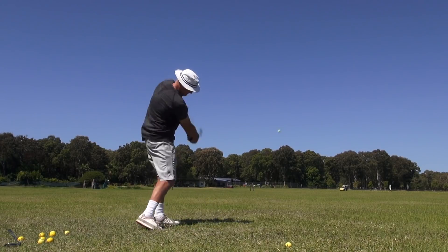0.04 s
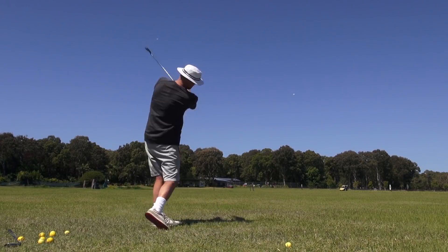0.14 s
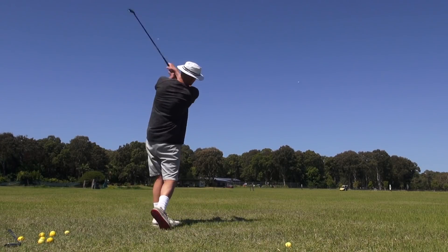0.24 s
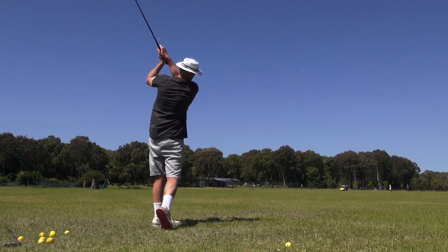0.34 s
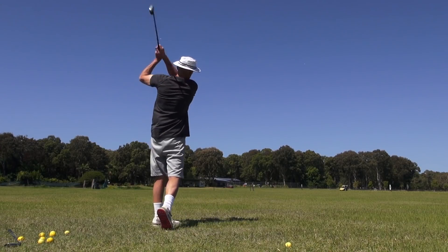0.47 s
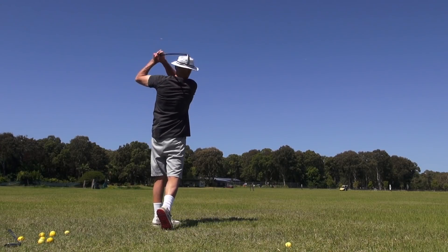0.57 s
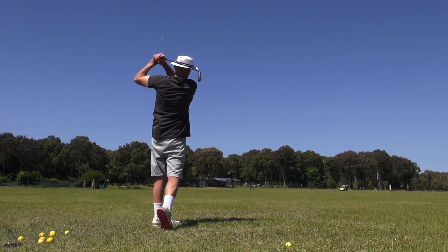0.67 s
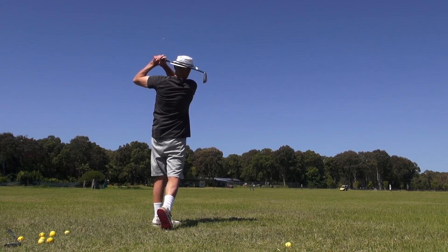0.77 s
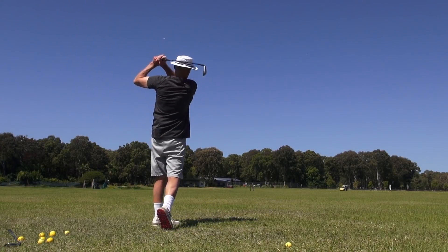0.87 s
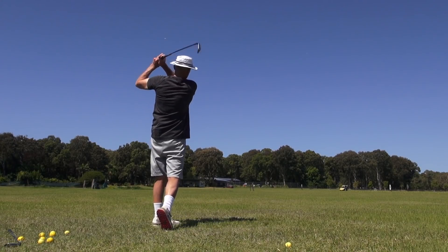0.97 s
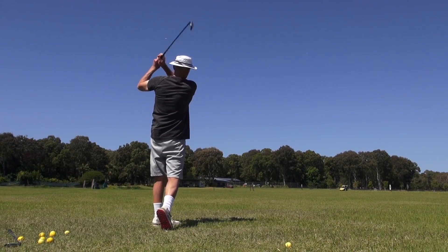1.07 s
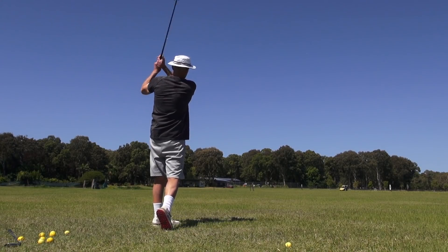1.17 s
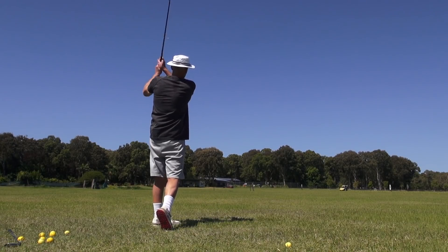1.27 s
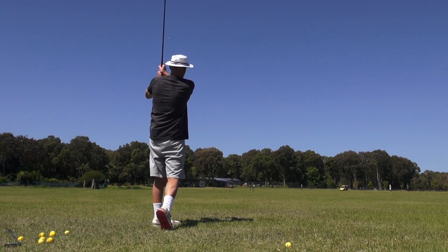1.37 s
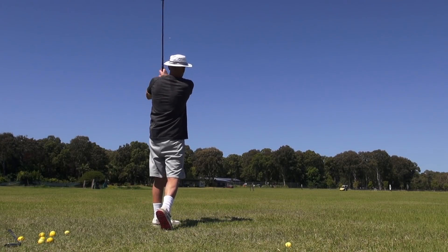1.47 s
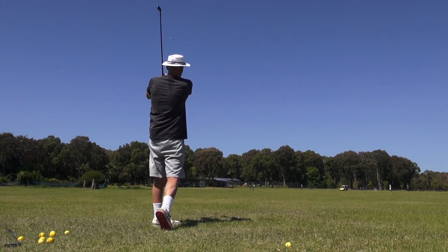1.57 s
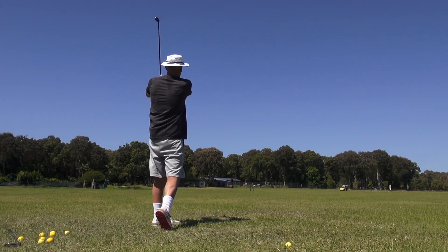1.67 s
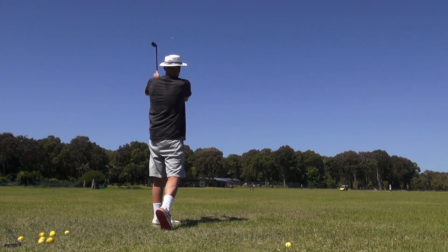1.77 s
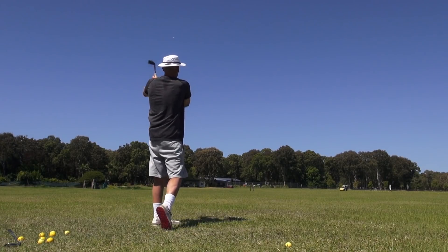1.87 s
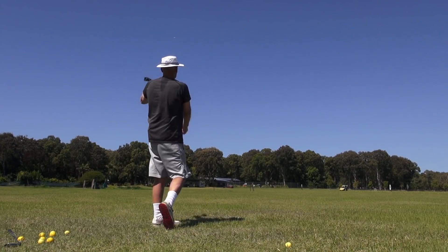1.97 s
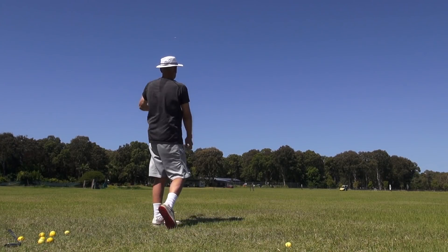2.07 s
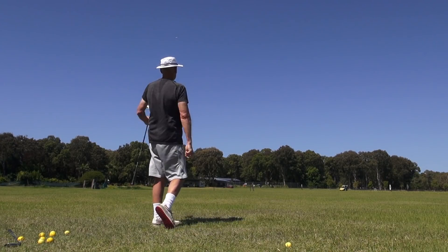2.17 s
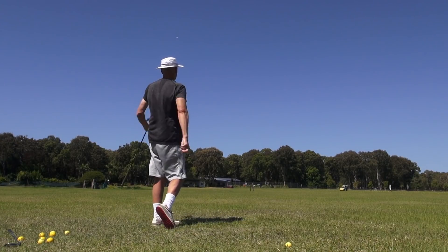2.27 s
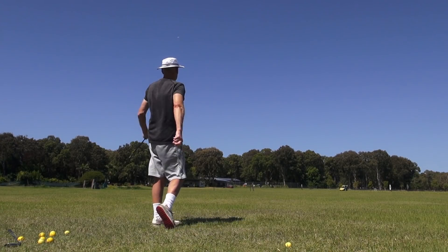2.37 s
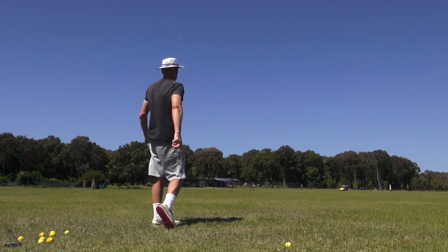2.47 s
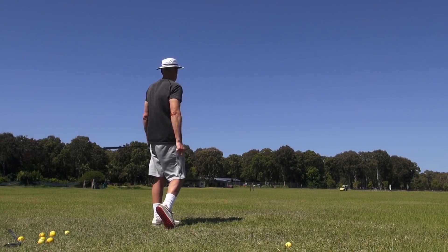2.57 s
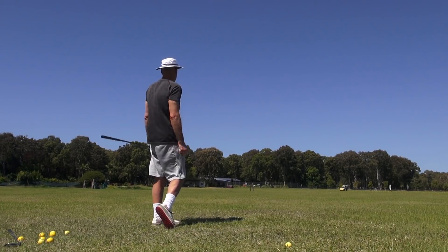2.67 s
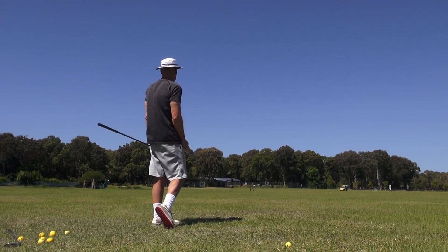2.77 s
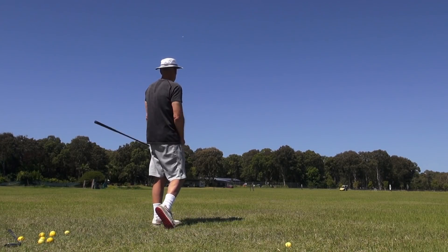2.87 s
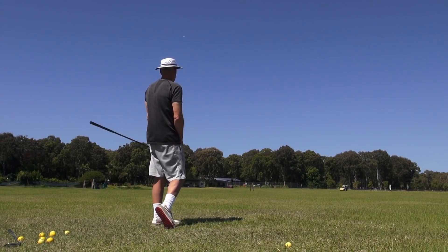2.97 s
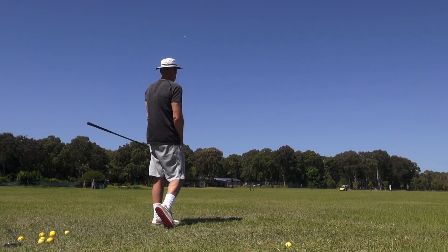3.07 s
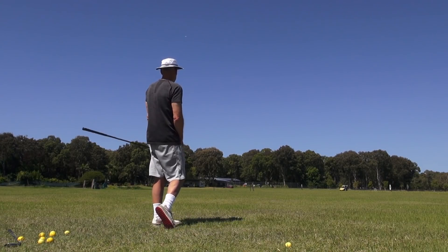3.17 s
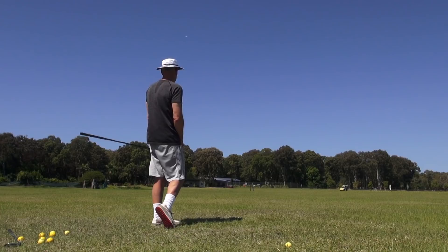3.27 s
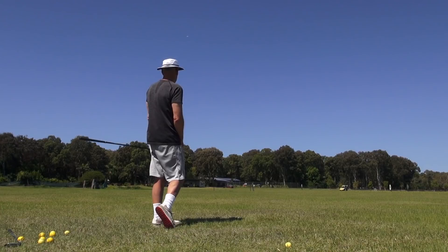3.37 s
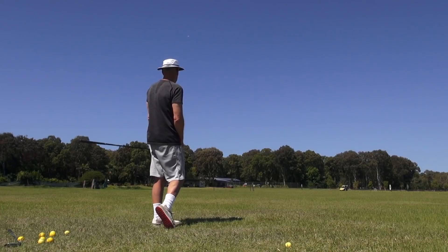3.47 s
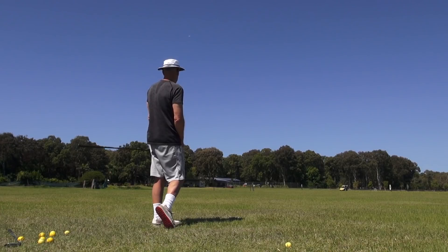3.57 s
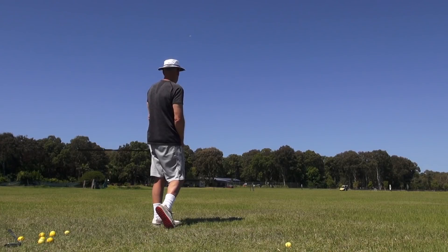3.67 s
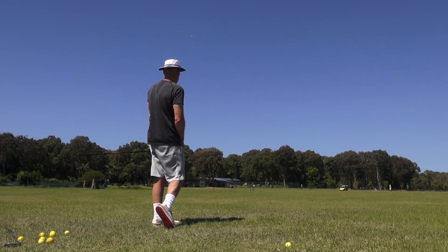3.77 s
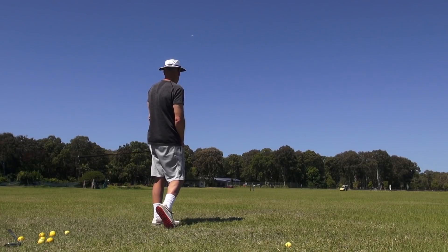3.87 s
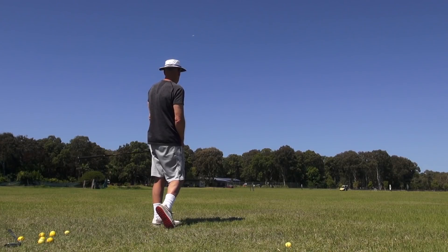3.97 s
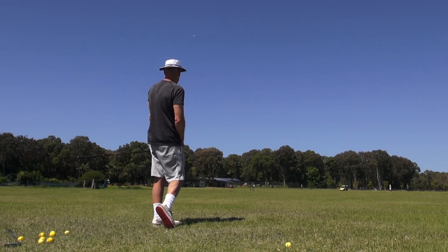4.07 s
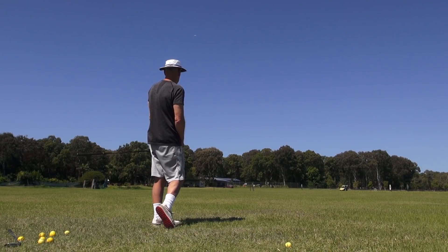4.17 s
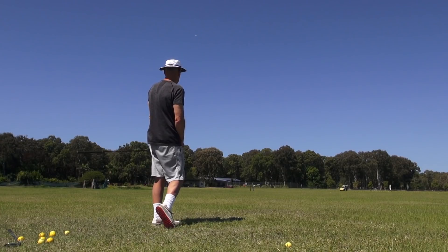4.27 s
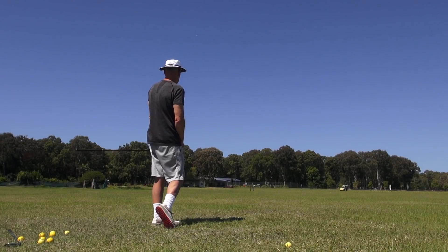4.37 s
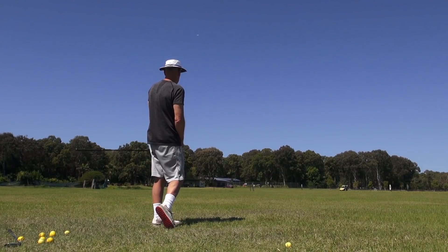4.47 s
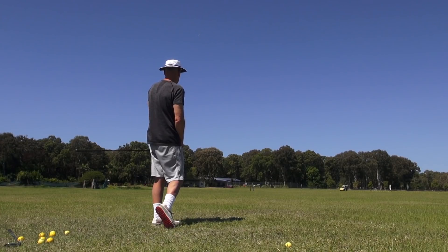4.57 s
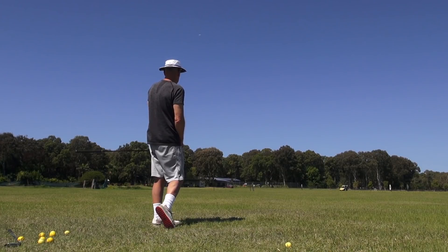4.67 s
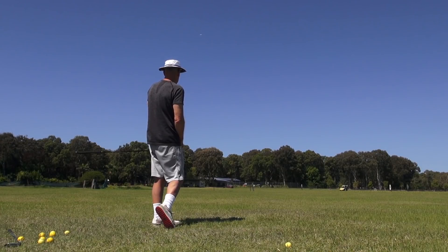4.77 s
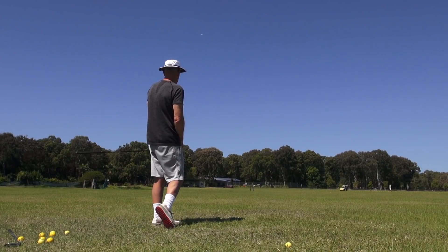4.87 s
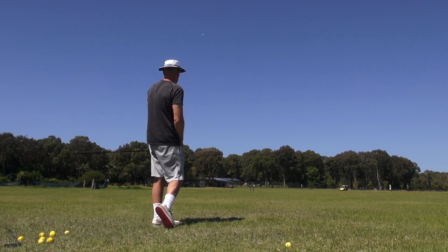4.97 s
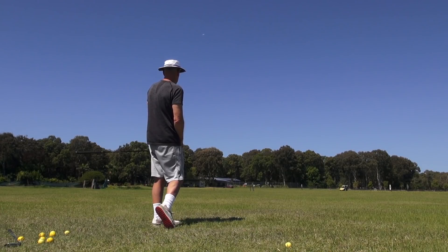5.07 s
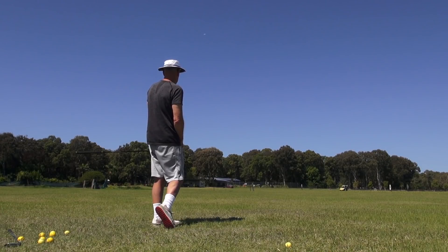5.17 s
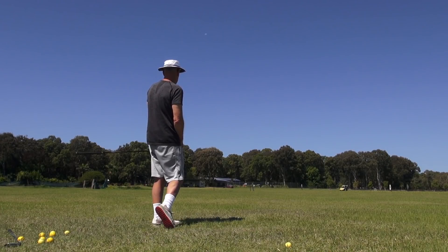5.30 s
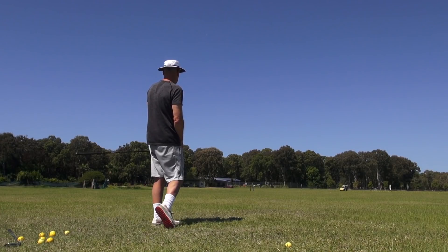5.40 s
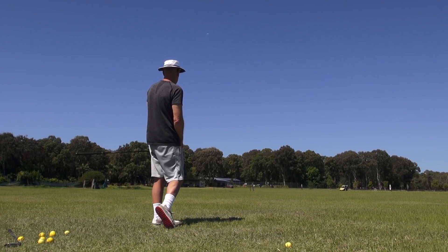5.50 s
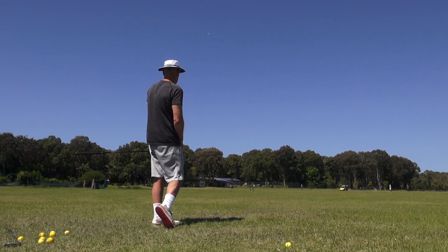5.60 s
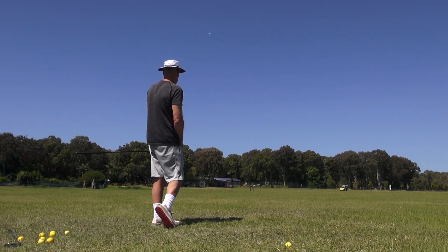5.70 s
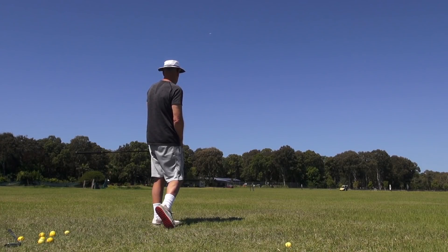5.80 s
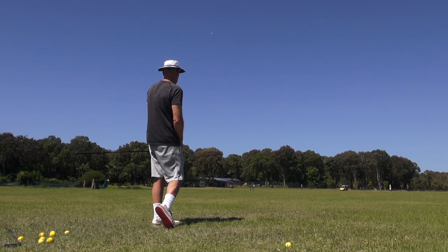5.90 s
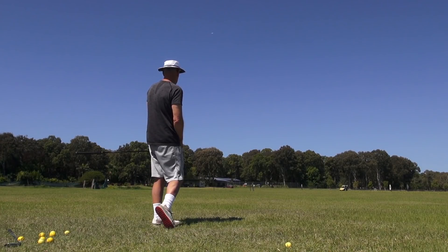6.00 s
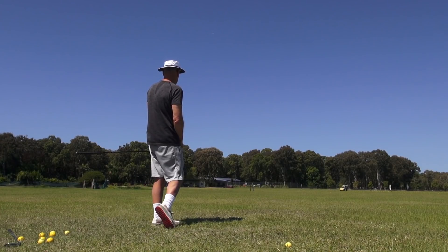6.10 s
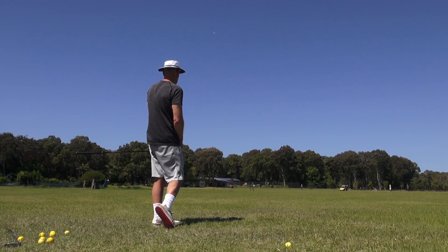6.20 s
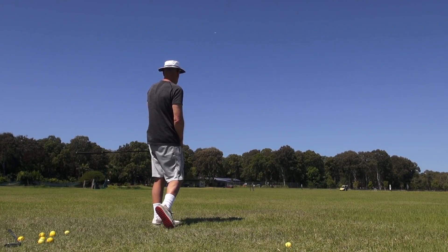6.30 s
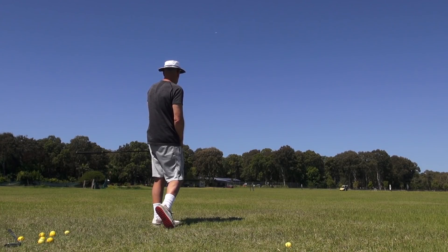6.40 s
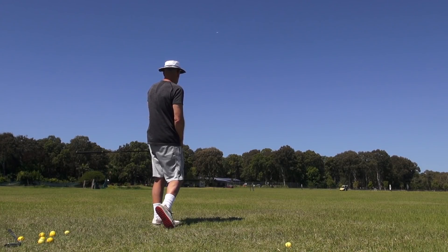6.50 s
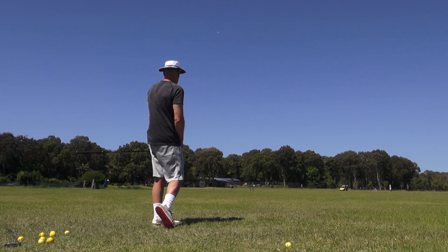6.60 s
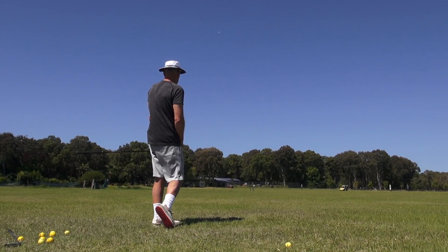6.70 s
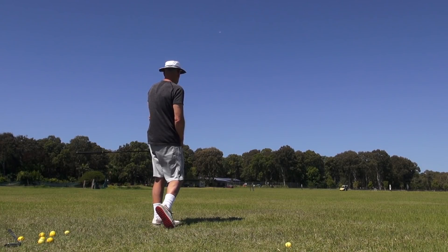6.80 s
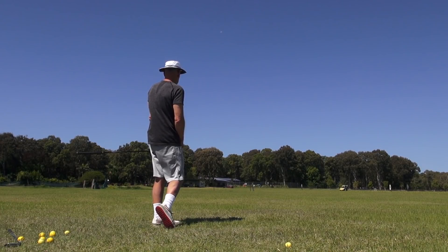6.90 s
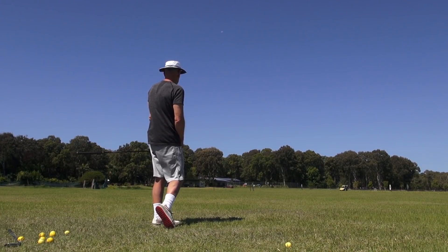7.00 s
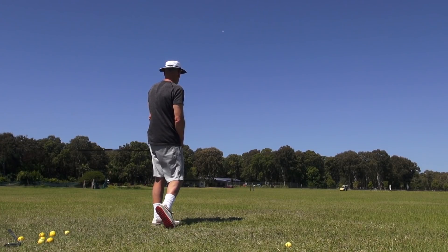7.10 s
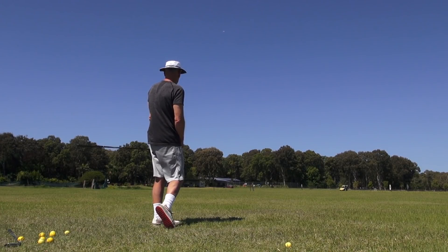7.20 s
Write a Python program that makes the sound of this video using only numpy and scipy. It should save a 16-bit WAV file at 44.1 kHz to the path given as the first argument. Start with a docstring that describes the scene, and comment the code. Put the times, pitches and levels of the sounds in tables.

```python
"""On an open range, a golfer hits an iron shot off turf a few metres from the microphone.
The club whooshes through grass and cracks on the ball: a pressure pulse, decaying resonances and torn turf.
Soil patters, thuds and ticks as filtered noise; cloth rustles and the shaft glides through the glove.
Wind buffets the microphone as low noise, and gusts stir the far trees.
Traffic, the hum of an engine, insects and birds lie in the distance, over a steady hiss."""
import sys
import numpy as np
from scipy import signal
from scipy.fft import rfft, irfft
from scipy.io import wavfile
from scipy.ndimage import uniform_filter1d

SR = 44100
rng = np.random.default_rng(int(sys.argv[2]) if len(sys.argv) > 2 else 0)


def digitize_waveform(pressure):
    """Quantize a signal to 16-bit integers and store it at the path in sys.argv[1].

    Rows of a 2-D input are taken as channels; values are limited to [-1, 1].
    """
    field = np.atleast_2d(pressure).T
    bounded = np.clip(field, -1, 1)
    quanta = np.round(bounded * 32767).astype(np.int16)
    wavfile.write(sys.argv[1], SR, quanta)


N = 319725
T = np.arange(N) / SR
STRIKE_S = .00765  # the club meets the ball


def undb(db):
    """Convert decibels to gain."""
    return 10 ** (np.asarray(db) / 20)


def unit(x):
    """Scale to rms 1."""
    return x / np.sqrt(np.mean(x ** 2))


def walk(rate):
    """Smoothed random steps, rate per second, with rms 1."""
    step = int(SR / rate)
    steps = np.repeat(rng.standard_normal(N // step + 2), step)
    return unit(uniform_filter1d(steps, step)[:N])


def colour(x, points):
    """Filter by an (f/Hz, level/dB) spectrum that falls steeply beyond its ends; rms 1."""
    hz, db = np.transpose(points)
    f = np.maximum(np.fft.rfftfreq(N, 1 / SR), 1)
    skirts = np.minimum(f / hz[0], 1) ** 3 * np.minimum(hz[-1] / f, 1) ** 3
    gain = undb(np.interp(np.log(f), np.log(hz), db))
    return unit(irfft(rfft(x) * skirts * gain, N))


def noise(side_db, grain_db=0):
    """Stereo noise of rms 1; grain_db breaks it into millisecond grains of uneven size."""
    mid, side = rng.standard_normal((2, N))
    stereo = mid + undb(side_db) * np.array([side, -side])
    return unit(stereo * undb(grain_db * walk(1100)))


def gliding_noise(hz, width_hz, side_db):
    """A narrow band of noise about a moving centre; rms 1."""
    lowpass = signal.butter(2, width_hz / 2, fs=SR, output="sos")
    eddies = signal.sosfilt(lowpass, noise(side_db) + 1j * noise(side_db))
    carrier = np.exp(2j * np.pi * np.cumsum(hz) / SR)
    return unit(np.real(eddies * carrier))


def band(x, hz, width):
    """One resonance, gain 1 at its centre."""
    hz = min(hz, .45 * SR)
    return signal.lfilter(*signal.iirpeak(hz, hz / min(width, SR / 4), fs=SR), x)


def decay(start, t60, rise):
    """An envelope that builds up from its start and dies away."""
    age = np.maximum(T - start, 0)
    return (1 - np.exp(-age / rise)) * np.exp(-np.log(1000) * age / t60)


def swell(peak_s, half_s):
    """A smooth rise and fall, 1 at its peak."""
    return np.exp(-((T - peak_s) / half_s) ** 2)


def swells(rows, steady_db=-120):
    """Swells of (peak t/s, level/dB, half-length t/s) that add in power to a steady level."""
    power = sum((undb(db) * swell(s, half_s)) ** 2 for s, db, half_s in rows)
    return np.sqrt(undb(steady_db) ** 2 + power)


def tone(hz, db, waver):
    """A sine at an rms level in dB, its pitch wavering at random by a share of itself."""
    phase = 2 * np.pi * np.cumsum(hz * (1 + waver * walk(90))) / SR
    return undb(db) * unit(np.sin(phase))


def bursts(rows, t60, rise, width_share):
    """Small dry contacts, (t/s, level/dB, f/Hz): each a short, broad noise burst about its own pitch."""
    grit = noise(side_db=-13.0)
    total = 0
    for s, db, hz in rows:
        width = width_share * hz
        burst = unit(band(band(grit, hz, width), hz, width))
        total = total + undb(db) * burst * decay(s, t60, rise)
    return total


# gusts on the microphone: (peak t/s, level/dB, half-length t/s)
MIC_GUSTS = [(.115, -26.5, .05), (.185, -24, .042), (.285, -31.5, .02), (.35, -30.5, .026),
             (1.72, -45, 0.19), (2.23, -26, 0.05), (2.35, -30, 0.061), (3.26, -35.5, .08),
             (3.5, -38.5, 0.1), (4.08, -36, 0.074), (4.3, -36.5, 0.036), (6.55, -33, 0.18),
             (6.89, -34.5, 0.2)]
# spectrum of wind at the microphone: (f/Hz, relative level/dB per Hz)
WIND_SPECTRUM = [(18, -4), (30, 1), (52, 0), (75, -6), (110, -14), (160, -23), (250, -33), (450, -44)]


def wind(breeze_db=-42.7, breeze_waver_db=0.6):
    """Eddies buffet the microphone; a light breeze and gusts set their strength."""
    eddies = colour(noise(side_db=-26), WIND_SPECTRUM)
    # even out the eddies' own swells, so that the breeze and gusts set the level
    eddies = eddies / np.sqrt(uniform_filter1d(np.mean(eddies ** 2, axis=0), size=3000))
    return eddies * swells(MIC_GUSTS, breeze_db + breeze_waver_db * walk(6.5))


# cars that stand out from the distant road: (peak t/s, half-length t/s, roar level/dB, hiss level/dB)
PASSING_CARS = [(.92, 0.19, -58, -48.5), (2.717, 0.12, -63, -51), (4.404, 0.33, -47, -51.5),
                (7.201, 0.38, -47.5, -72)]
# spectra of road roar, tyre hiss and low rumble: (f/Hz, relative level/dB per Hz)
ROAR_SPECTRUM = [(120, -9), (200, -7.5), (330, -8), (480, -3.5), (640, -1), (820, 1.5), (950, -0.5),
                 (1200, -10), (1700, -32)]
TYRE_SPECTRUM = [(700, -16), (1000, 2.5), (1250, 2), (1600, -1), (2000, -9), (2600, -17.5), (3500, -27.5),
                 (5000, -41.5)]
RUMBLE_SPECTRUM = [(70, 0.5), (110, 0), (160, -3.5), (230, -10), (330, -17.5)]


def traffic(roar_db=-44, tyre_db=-50.5, roar_waver_db=0.44, tyre_waver_db=1.1):
    """Distant road: tyres roar and hiss, swell as a car goes by and waver in the moving air; a rumble recedes."""
    rumble_start_db, rumble_fade_db_per_s = -45, 0.5
    roar_level = swells([(s, db, half_s) for s, half_s, db, _ in PASSING_CARS], roar_db)
    tyre_level = swells([(s, db, half_s) for s, half_s, _, db in PASSING_CARS], tyre_db)
    roar = colour(noise(side_db=-16.0), ROAR_SPECTRUM) * roar_level * undb(roar_waver_db * walk(10))
    tyres = colour(noise(side_db=-14.0), TYRE_SPECTRUM) * tyre_level * undb(tyre_waver_db * walk(20))
    rumble_level = undb(rumble_start_db - rumble_fade_db_per_s * T)
    rumble = colour(noise(side_db=-15.0), RUMBLE_SPECTRUM) * rumble_level
    return roar + tyres + rumble


# orders of the far engine: (multiple of its firing rate, mean rms level/dB)
ENGINE_ORDERS = [(1, -40), (2, -53.5), (3, -57.5)]


def engine(firing_hz=50.4, drift=0.0046, waver_db=0.2):
    """A far engine at nearly steady speed: only its lowest orders carry this far."""
    phase = 2 * np.pi * np.cumsum(firing_hz * (1 + drift * walk(3))) / SR
    hum = 0
    for order, db in ENGINE_ORDERS:
        level = np.sqrt(2) * undb(db + waver_db * walk(2.8))
        hum = hum + level * np.sin(round(order) * phase)
    return hum


# insects in the grass: (mean f/Hz, rms level/dB)
INSECT_TONES = [(4269, -82.5), (4398, -88.5)]


def insects(waver=0.0028):
    """The thin sound of insects in the grass: faint tones that waver in pitch."""
    return sum(tone(hz, db, waver) for hz, db in INSECT_TONES)


# spectrum of the steady hiss: (f/Hz, relative level/dB per Hz)
HISS_SPECTRUM = [(1500, 0), (3200, 0), (4300, 0.75), (6000, -0.44), (10000, -0.19), (16000, -0.66)]


def hiss(level_db=-61):
    """A steady, wide hiss: nearly independent noise on each side."""
    return undb(level_db) * colour(noise(side_db=-1.5), HISS_SPECTRUM)


# gusts in the far trees: (peak t/s, level/dB before flutter, half-length t/s)
FAR_GUSTS = [(.52, -39.5, 0.36), (1.15, -38, 0.42), (1.68, -41.5, .14), (1.89, -37.5, 0.17)]
# spectrum of the leaves: (f/Hz, relative level/dB per Hz)
LEAF_SPECTRUM = [(200, -17), (350, -13.5), (480, -6.5), (620, -3), (760, -2.5), (920, -8.5), (1150, -17),
                 (1650, -20.5), (2400, -32)]


def trees(calm_hz=478, gust_hz=863, sough_width_hz=420, sough_db=-45.5):
    """Gusts swell through the far trees: leaves rush, and branches sough higher and louder as a gust grows."""
    gust = swells(FAR_GUSTS)
    force = gust / gust.max()
    rush = colour(noise(side_db=-22.5), LEAF_SPECTRUM) * gust
    sough_hz = calm_hz + (gust_hz - calm_hz) * force
    sough = gliding_noise(sough_hz, sough_width_hz, side_db=-22.0) * undb(sough_db) * force ** 2
    return (rush + sough) * undb(.5 * walk(23))


# spectrum of swept grass and torn turf: (f/Hz, relative level/dB per Hz)
GRASS_SPECTRUM = [(200, -22), (1200, 3), (2500, -3.5), (3600, 1.5), (4600, -4.5), (5400, -2), (6500, -13),
                  (8600, -2), (10900, -9), (11700, -19), (13500, -19), (14800, -10.5), (15700, -21)]


def swing(wake_width_hz=200):
    """The head whooshes in and tears the turf; the eddies behind it slow down and sink in pitch."""
    # the head swishes through the grass on both sides of contact
    swish_db, swish_half_s = -26, .0115
    swish = undb(swish_db) * swell(STRIKE_S, swish_half_s)
    # its sole tears the turf just before it meets the ball
    tear_db, tear_lead_s, tear_rise_s, tear_fall_s = -11, .0005, .0009, .0033
    age = T - (STRIKE_S - tear_lead_s)
    tear = undb(tear_db) * np.exp(-np.maximum(-age / tear_rise_s, age / tear_fall_s))
    grass = colour(noise(side_db=-12.5), GRASS_SPECTRUM) * np.hypot(swish, tear)
    # the whoosh is loudest just before contact
    whoosh_db, whoosh_lead_s, whoosh_half_s = -22, .0089, .011
    whoosh = undb(whoosh_db) * swell(STRIKE_S - whoosh_lead_s, whoosh_half_s)
    # the wake lasts through the follow-through; its pitch is highest at contact
    wake_db, wake_lasts_s = -40.5, .34
    wake = undb(wake_db) * np.exp(-(T / wake_lasts_s) ** 8)
    top_hz, end_hz, sink_s = 545.5, 90, .072
    air_hz = end_hz + (top_hz - end_hz) * swell(STRIKE_S, sink_s)
    air = gliding_noise(air_hz, wake_width_hz, side_db=-15) * np.hypot(whoosh, wake)
    return grass + air


# ringing of club head and ball: (f/Hz, width f/Hz, relative level/dB)
HEAD_MODES = [(1190, 440, -6), (1975, 110, -1.5), (2470, 350, -4), (3475, 110, 2), (4020, 380, -8),
              (5210, 270, -3), (5490, 115, -1.8), (6370, 200, -20), (7770, 125, -12.5), (8110, 95, -10.5),
              (8900, 420, -5.8), (9820, 540, -15), (10900, 130, -24), (12320, 65, -20.5), (14750, 480, -17)]


def strike(ring_db=-47.0, build_share=.26):
    """Half a millisecond of contact sends out one pressure pulse, then head and ball ring."""
    contact_s, release_s = .000125, .00013
    push = -np.exp(-.5 * ((T - STRIKE_S) / contact_s) ** 2)
    age = np.maximum(T[:SR // 8] - STRIKE_S - release_s, 0)
    ring = 0
    for k, (hz, width, db) in enumerate(HEAD_MODES):
        # a wider resonance speaks sooner, starts stronger and dies sooner
        fade = np.exp(-np.pi * width * age)
        build = 1 - fade ** (1 / build_share)
        mode = undb(db + ring_db) * width * fade * build * np.sin(2 * np.pi * hz * age)
        # neighbours swing in opposite directions
        ring = ring + (-1) ** k * mode
    return push + np.pad(ring, (0, N - len(age)))


def scattered(crack, scatter_db=-14, t60=0.012):
    """Uneven ground throws the crack back a little differently to each side."""
    age = T[:SR // 40]
    paths = rng.standard_normal(len(age)) * np.exp(-np.log(1000) * age / t60)
    side = undb(scatter_db) * signal.fftconvolve(crack, paths / np.linalg.norm(paths))[:N]
    # the blow is straight ahead of the microphone, so both sides are equally loud
    side = side - crack * (side @ crack) / (crack @ crack)
    return crack + np.array([side, -side])


# spectrum of the spray of soil and grass: (f/Hz, relative level/dB per Hz)
SOIL_SPECTRUM = [(710, -24.5), (1200, -3), (1380, -14.5), (1600, -8.5), (2140, -11.5), (3980, -15),
                 (5040, -14.5), (9680, -18), (15500, -21.5)]


def spray(level_db=-48.5, t60_s=2.9, build_s=0.009, clump_db=1.5, crumb_db=1.8):
    """Crumbs of soil and grass patter down after the shot, in uneven grains, and die away."""
    crumbs = colour(noise(side_db=-13.0, grain_db=crumb_db), SOIL_SPECTRUM)
    clumps = undb(clump_db * walk(110))
    return crumbs * clumps * undb(level_db) * decay(STRIKE_S, t60_s, build_s)


# soil landing, shoe and cloth ticks: (start t/s, relative level/dB, centre f/Hz)
SMALL_TICKS = [(.0315, -40, 3200), (.038, -40, 3200), (.0415, -40, 2800), (.0532, -33.5, 3700),
               (.0845, -41, 2000), (.208, -37, 1300), (.215, -35, 1300), (.2398, -43, 2800),
               (.2895, -50, 3500), (.3385, -45, 2200), (.347, -37, 1100), (.3508, -29.5, 1350),
               (1.7125, -49, 2400)]
# the divot lands and the feet settle: (start t/s, level/dB before the envelope, centre f/Hz)
DULL_THUDS = [(.052, -32, 200), (.079, -35, 170), (.262, -31.5, 180), (.338, -33, 170)]
# the shirt catches and lets go: (start t/s, relative level/dB, centre f/Hz)
SHIRT_SCRAPES = [(1.541, -42, 6000), (1.5465, -34, 6000), (1.554, -37, 4000), (1.566, -36.5, 6500),
                 (1.582, -38, 7000), (1.599, -37, 5000), (1.621, -43, 4800), (1.7905, -48, 8000)]


def ticks(gain_db=-2, scrape_db=-1.5):
    """Clods tick and thud on the turf, shoes shift and the shirt catches in small, bright scrapes."""
    knocks = bursts(SMALL_TICKS, t60=.016, rise=.00035, width_share=1.5)
    thuds = bursts(DULL_THUDS, t60=.09, rise=.002, width_share=1.2)
    scrapes = bursts(SHIRT_SCRAPES, t60=.012, rise=.0006, width_share=1.5)
    return undb(gain_db) * knocks + thuds + undb(scrape_db) * scrapes


# shirt and glove rubbing, one row per movement: (peak t/s, level/dB before flutter, half-length t/s)
CLOTH_MOVES = [(.205, -52.5, 0.039), (1.25, -60, 0.62), (1.552, -52.5, 0.039), (1.59, -54, 0.027),
               (1.688, -58, 0.027), (2.02, -57, 0.23), (2.7, -64, 0.97)]
# spectrum of the cloth: (f/Hz, relative level/dB per Hz)
CLOTH_SPECTRUM = [(1200, -17), (2400, 2), (3500, -2.5), (4500, -1), (5600, -1.5), (7500, -3.5), (11000, -5),
                  (13000, -6), (15500, -11.5)]
# shaft sliding through the glove: (peak t/s, level/dB before catching, half-length t/s,
# mean f/Hz at the peak, glide in Hz per s, width f/Hz)
GLOVE_SLIDES = [(0.185, -58, .014, 6100, -5000, 1500), (0.213, -50, 0.023, 4170, -4000, 500),
                (1.55, -53, 0.015, 2470, 1502.5, 500), (1.612, -57, 0.027, 4700, -4000, 700),
                (1.6225, -49.5, 0.0032, 4800, -4000, 800), (1.687, -60, 0.023, 6330, 2000, 2400),
                (1.794, -58, 0.017, 9800, 29998, 1400), (1.817, -54, 0.023, 12200, 94998, 2800),
                (1.804, -57, .016, 5700, -5000, 900), (1.858, -59, 0.038, 5700, -4000, 1500),
                (1.926, -59, 0.022, 5400, 4002, 800), (1.95, -63, 0.018, 7200, 7999, 2800),
                (1.915, -60.5, 0.14, 2394, 499, 400)]


def golfer(flutter_db=0.8, catch_db=2.5, wobble_share=0.0263):
    """Cloth rustles; the shaft catches and slips in the glove with a gliding, hissy note."""
    cloth = colour(noise(side_db=-10.0, grain_db=1.56), CLOTH_SPECTRUM)
    rustle = cloth * swells(CLOTH_MOVES) * undb(flutter_db * walk(90))
    wobble = 1 + wobble_share * walk(120)
    rubs = 0
    for s, db, half_s, hz, glide, width_hz in GLOVE_SLIDES:
        rub_hz = hz * wobble + glide * (T - s)
        rubs = rubs + gliding_noise(rub_hz, width_hz, side_db=-8) * undb(db) * swell(s, half_s)
    return rustle + rubs * unit(undb(catch_db * walk(250)))


# far bird calls: (middle t/s, half-length t/s, level/dB before the swell, top f/Hz before warble)
FAR_CALLS = [(.9, 0.057, -59, 1830), (2.09, 0.053, -54, 1594), (2.575, 0.052, -56.5, 1740),
             (2.69, 0.05, -57, 1910), (2.73, 0.072, -56, 1477), (3.17, .05, -57.5, 1517)]


def birds(warble=0.00405, arch_share=0.17):
    """Far bird calls: faint, wavering tones that arch in pitch and swell with effort."""
    calls = 0
    for s, half_s, db, top_hz in FAR_CALLS:
        effort = swell(s, half_s)
        # arch_share: how far the ends of a call lie below its top
        hz = top_hz * (1 - arch_share * (1 - np.sqrt(effort)))
        calls = calls + effort * tone(hz, db, warble)
    return calls


def scene(dip_db=-4, dip_s=0.17):
    """Open ground, no reverberation: only the turf close by reflects; trees and traffic dip around the crack."""
    distance = (trees() + traffic()) * undb(dip_db * swell(STRIKE_S, dip_s))
    background = wind() + distance + engine() + insects() + hiss()
    shot = swing() + scattered(strike()) + spray() + ticks() + golfer()
    return background + shot + birds()


def record(dry, top_hz=15850):
    """The recorder rounds off the crack at full scale and cuts the top."""
    rounded = dry / (1 + dry ** 8) ** (1 / 8)
    return signal.sosfilt(signal.ellip(10, .1, 80, top_hz, fs=SR, output="sos"), rounded)


dry = scene()
out = record(dry)
digitize_waveform(out)
```